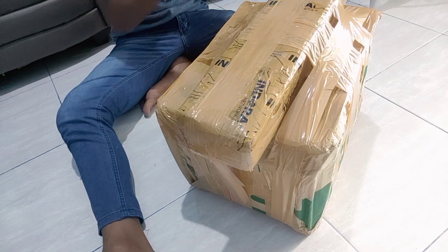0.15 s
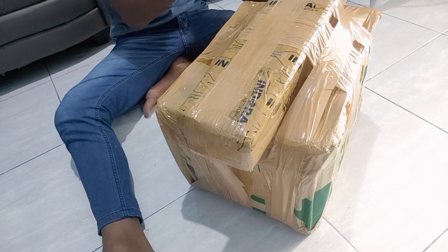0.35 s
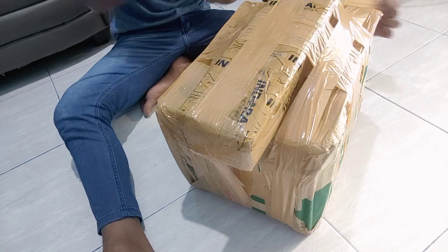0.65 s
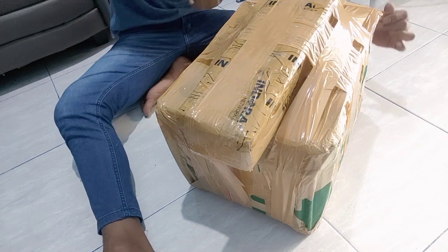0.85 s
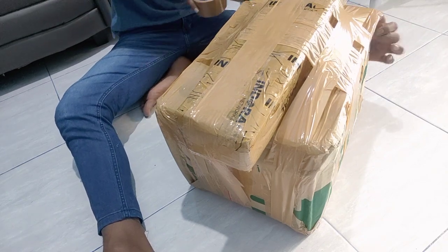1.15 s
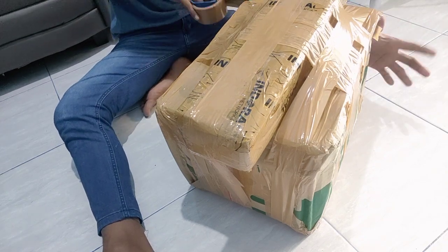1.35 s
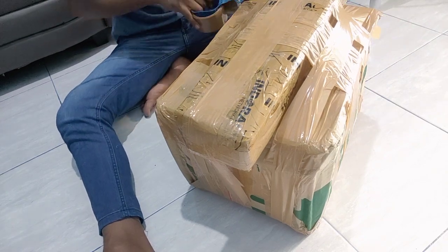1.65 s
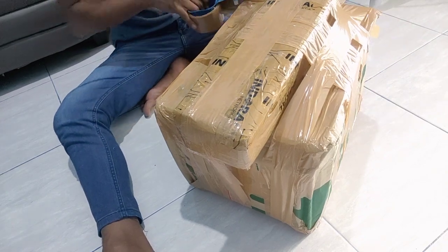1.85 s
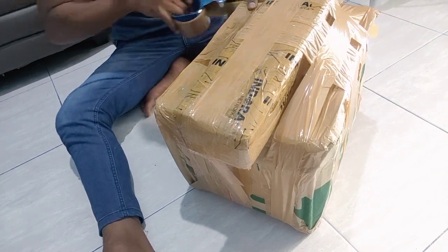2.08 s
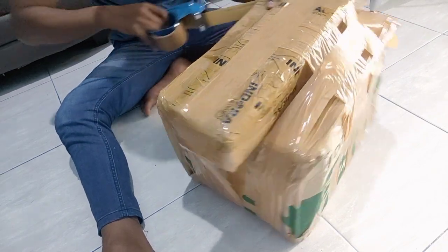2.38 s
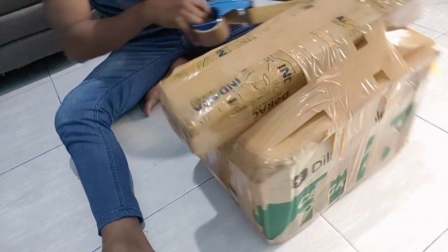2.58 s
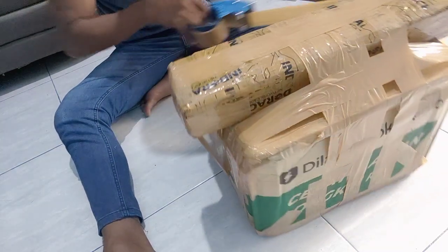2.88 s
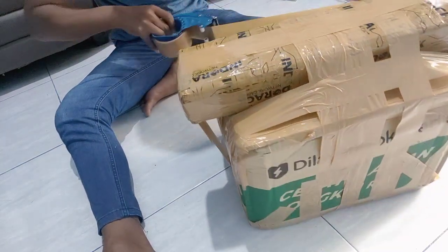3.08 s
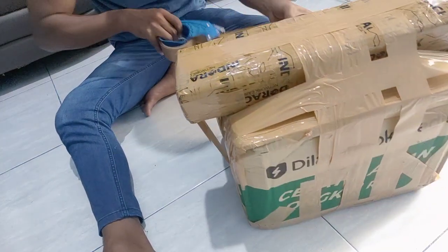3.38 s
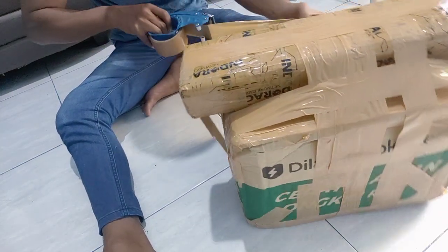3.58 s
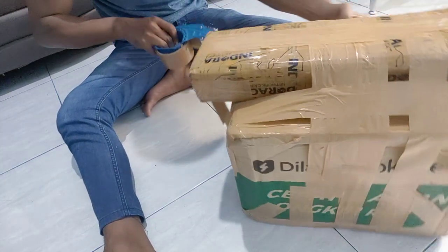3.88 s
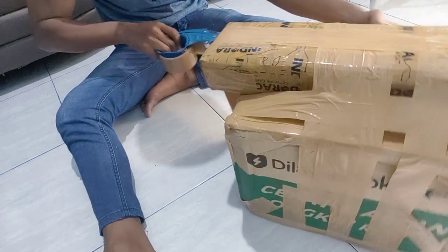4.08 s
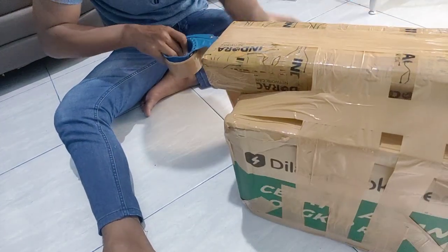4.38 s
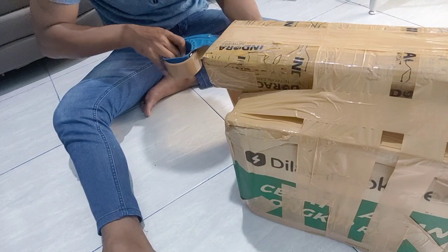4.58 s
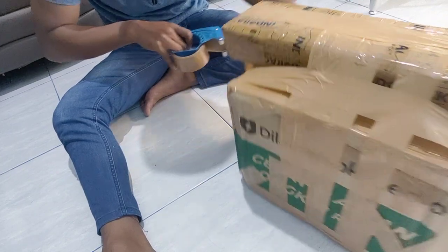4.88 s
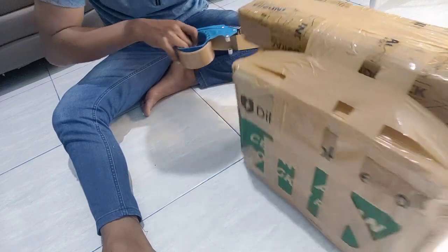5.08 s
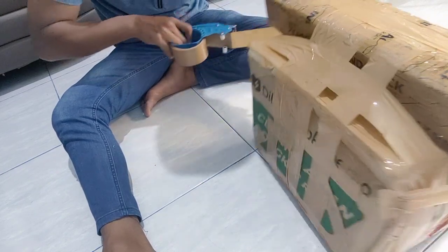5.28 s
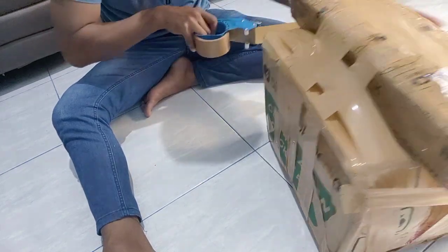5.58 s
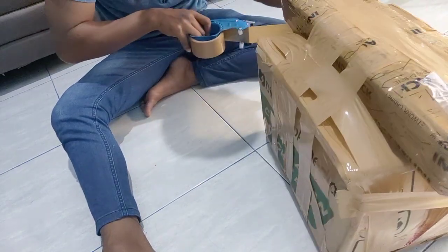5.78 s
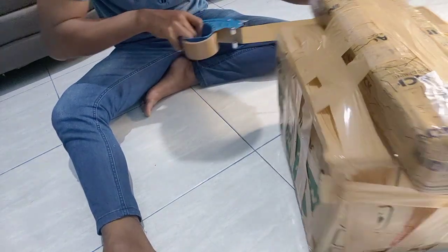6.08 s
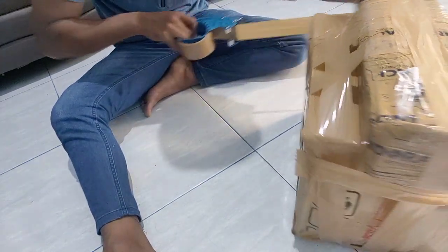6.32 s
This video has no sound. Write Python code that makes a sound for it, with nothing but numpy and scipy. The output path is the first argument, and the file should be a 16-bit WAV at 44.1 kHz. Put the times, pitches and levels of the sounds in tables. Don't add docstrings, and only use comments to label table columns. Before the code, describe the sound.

A hand dispenser rips adhesive tape onto a hollow cardboard box in a small hard-floored room. A fast tearing pull comes first, then a pause with ticks and a thud, two brief rips, a long stutter and two slow jerky pulls that end in the hardest cracks. Cardboard scrapes softly as the box turns. Close stereo pickup, with gain dipping during pulls, occasional low bumps and slight overload.

```python
import sys
import numpy as np
from scipy import signal
from scipy.fft import rfft, irfft
from scipy.io import wavfile
from scipy.ndimage import uniform_filter1d

SR = 44100
rng = np.random.default_rng(int(sys.argv[2]) if len(sys.argv) > 2 else 0)


def voltage_ratio(level):
    return 10 ** (np.asarray(level, float) / 20)


def generate_wav(sig):
    pcm = np.round(np.clip(np.atleast_2d(sig).T, -1, 1) * 32767).astype(np.int16)
    wavfile.write(sys.argv[1], SR, pcm)


N = 284445
TIME = np.arange(N) / SR
# (start [s], last slip [s], gain duck [dB], crackle that shakes the span [dB],
# film whistle [dB])
PULLS = [
    (0, 0.459, -11, 0, -8.5),
    (1.687, 2.06, -9, 4, -27),
    (2.531, 2.839, -7, 1.5, -28),
    (3.105, 3.838, -7, -6, -22.5),
    (4.464, 5.023, -7.5, -4.5, -20),
    (5.608, 6.013, -7.5, -5.5, -23),
]


def at_hz(points, hz):
    table_hz, values = np.transpose(points)
    return np.interp(np.log(hz + 1), np.log(table_hz), values)


def colour(x, spectrum):
    gain = voltage_ratio(at_hz(spectrum, np.fft.rfftfreq(4096, 1 / SR)))
    cepstrum = irfft(np.log(gain / np.sqrt(np.mean(gain ** 2))))
    cepstrum[1:2048] *= 2
    cepstrum[2049:] = 0
    response = irfft(np.exp(rfft(cepstrum)))
    return signal.oaconvolve(x, response[None], axes=1)[:, :x.shape[1]]


def resonance(x, hz, width_hz):
    r = np.exp(-np.pi * width_hz / SR)
    poles = [1, -2 * r * np.cos(2 * np.pi * hz / SR), r * r]
    return signal.lfilter([(1 - r * r) / 2, 0, (r * r - 1) / 2], poles, x + 1e-18)


def gliding(x, hz, width_hz):
    turn = np.exp(2j * np.pi * np.cumsum(hz) / SR)
    r = np.exp(-np.pi * width_hz / SR)
    return 2 * np.real(turn * signal.lfilter([1 - r], [1, -r], x / turn))


def alike_pair(mid, side):
    # (frequency [Hz], left-right likeness [0-1])
    likeness = [(60, 0.96), (240, 0.95), (950, 0.42), (3770, 0.014), (15000, 0.0086)]
    alike = np.clip(at_hz(likeness, np.fft.rfftfreq(len(mid), 1 / SR)), 0, 1)
    both = np.sqrt(1 + alike) * rfft(mid) + np.sqrt(1 - alike) * rfft(side) * [[1], [-1]]
    return irfft(both, len(mid)) / np.sqrt(2)


def impulses(times, sizes):
    train = np.zeros(N)
    train[(np.asarray(times) * SR).astype(int)] = sizes
    return train


def gated(tables):
    curve = 0
    for rows in tables:
        inside = (TIME > rows[0][0]) * (TIME < rows[-1][0])
        curve = curve + voltage_ratio(np.interp(TIME, *np.transpose(rows))) * inside
    return curve


def pull_spans():
    edges = [0] + [int((pull[0] - .1) * SR) for pull in PULLS[1:]] + [N]
    return zip(edges, edges[1:])


def per_pull(values):
    return np.concatenate([np.broadcast_to(v, N)[a:b] for v, (a, b) in zip(values, pull_spans())])


def duck_db():
    hold_s, release_s = 0.097, 0.011
    ducks = []
    for start, end, db, *rest in PULLS:
        recovery = np.exp(-np.maximum(TIME - end - hold_s, 0) / release_s)
        ducks.append(db * (TIME > start) * recovery)
    return uniform_filter1d(np.min(ducks, axis=0), size=80)


def slips():
    # (time [s], crack level [dB])
    lone = [(0.0008, -18.5), (0.244, -23), (0.3078, -23.5), (0.3288, -19), (0.351, -17.5), (0.4, -24),
            (0.4196, -31), (0.4291, -21), (0.4743, -20.5), (1.687, -24), (1.744, -29.5), (1.7732, -28),
            (1.822, -20), (1.8474, -21), (1.8669, -22), (2.066, -18.5), (2.5207, -22.5), (2.5441, -30.5),
            (2.634, -28.5), (2.707, -19.5), (2.7297, -27), (2.774, -24), (2.8393, -20.5),
            (3.1838, -27.5), (3.2106, -21.5), (3.2415, -16), (3.2709, -17.5), (3.3043, -17.5),
                    (3.3386, -17), (3.3701, -14.5), (3.4148, -14.5), (3.4721, -14), (3.566, -17.5),
                    (3.6361, -19.5), (3.6815, -17.5), (3.7132, -23), (3.73, -21.5), (3.7558, -17.5),
                    (3.7791, -19), (3.8154, -19), (3.843, -16.5),
            (4.4639, -21.5), (4.518, -23), (4.5702, -22), (4.6271, -23), (4.6992, -23),
                     (4.7561, -22), (4.796, -18.5), (4.8521, -24), (4.8846, -26.5), (4.9, -32),
                     (4.9178, -24.5), (4.938, -24.5), (4.9703, -17.5), (5.0047, -24.5), (5.032, -14.5),
                     (5.6083, -22), (5.674, -23), (5.7325, -23.5), (5.7666, -26), (5.7948, -17.5),
                     (5.9532, -10.5), (5.9753, -13.5), (6.0184, -16)]
    # (time [s], crack level [dB])
    ticks = [(0.6711, -55), (0.8023, -47), (0.9192, -39), (0.968, -44), (1.0109, -32.5), (1.641, -46),
             (1.659, -45), (1.722, -32.5), (2.9415, -32), (3.0914, -46), (3.1047, -23.5), (3.1399, -26.5),
             (4.163, -52), (4.185, -47.5), (4.2423, -54), (4.259, -47.5), (5.5644, -38.5), (5.628, -25),
             (5.81, -27)]
    # (first [s], last [s], gap [s], first level [dB], last level [dB])
    chatter = [
        (0.026, 0.22, 0.019, -25.5, -23.5),
        (0.359, 0.393, 0.01, -19, -22.5),
        (1.889, 2.044, 0.0154, -26, -18),
        (2.622, 2.82, 0.0135, -26, -24),
        (5.8259, 5.938, 0.012, -22, -12.5),
    ]
    slip_ring_db, tick_ring_db, ring_spread_db = 0.5, -28, 2
    jitter_s, spread_db = 0.00087, 2.5
    rows = [(s, db, slip_ring_db) for s, db in lone]
    rows += [(s, db, tick_ring_db) for s, db in ticks]
    for first, last, gap, first_db, last_db in chatter:
        luck = rng.standard_normal(size=(40, 3))
        for s, (late, loud, ring) in zip(np.arange(first, last, gap), luck):
            db = np.interp(s, [first, last], [first_db, last_db])
            rows.append((s + jitter_s * late, db + spread_db * loud, slip_ring_db - ring_spread_db * abs(ring)))
    return np.transpose(rows)


def bursts(s, level_db, run_ms, fast_ms, slow_ms, slow_db):
    kicks = impulses(np.maximum(s - run_ms / 4000, 0), voltage_ratio(level_db))

    def fall(ms):
        return signal.lfilter([1], [1, -np.exp(-1000 / (ms * SR))], kicks + 1e-18)

    run = np.hanning(int(run_ms * SR / 1000) + 3)
    return signal.oaconvolve(fall(fast_ms) + voltage_ratio(slow_db) * fall(slow_ms), run / run.sum())[:N]


def slip_grit():
    grit = rng.standard_normal((3, N)) * voltage_ratio(4.4 * rng.standard_normal(N))
    return 0.65 * grit[0] + 1.05 * grit[1:]


def crackle(per_s, spread_db):
    # (time [s], level [dB])
    effort = [
        [(0.0, -19), (0.134, -28.5), (0.22, -21.5), (0.321, -18), (0.48, -31)],
        [(0.91, -39), (0.97, -56), (1.01, -43), (1.1, -59)],
        [(1.69, -45), (1.856, -23.5), (2.024, -22.5), (2.07, -59)],
        [(2.53, -33), (2.58, -29), (2.7, -18.5), (2.85, -27)],
        [(3.11, -43), (3.2, -36), (3.4, -30), (3.508, -28), (3.58, -45), (3.7, -31.5), (3.85, -24.5)],
        [(4.47, -55), (4.6, -35.5), (4.824, -25.5), (4.97, -42), (5.04, -12.5)],
        [(5.61, -32), (5.72, -51), (5.8, -26.5), (5.938, -19.5), (5.996, -17.5), (6.03, -43)],
    ]
    sizes = voltage_ratio(spread_db * np.minimum(rng.exponential(1, N), 4)) * rng.standard_normal((2, N))
    snaps = sizes * (rng.random(N) < per_s / SR)
    return gated(effort) * snaps / np.std(snaps)


def cracks(s, crack_db, ring_db, grit):
    full = grit * bursts(s, crack_db + 7.0, run_ms=2.38, fast_ms=0.76, slow_ms=4.7, slow_db=-10)
    thin_db = crack_db - 0.89 * ring_db - 9.0
    thin = grit * bursts(s, thin_db, run_ms=0.82, fast_ms=0.44, slow_ms=3.6, slow_db=-11.5)
    return full + signal.sosfilt(signal.butter(2, 9500, "high", fs=SR, output="sos"), thin)


def film_whistle(fine):
    progress = per_pull(np.clip((TIME - start) / (end - start), 0, 1) for start, end, *rest in PULLS)
    film_hz = 6900 + 1910 * progress
    return gliding(fine * voltage_ratio(per_pull(pull[4] for pull in PULLS)), film_hz, width_hz=2100)


def span_ring(kick):
    # (before [Hz], after [Hz], time of slide [s], ring before [dB], ring after [dB])
    tension = [
        (1760, 1650, 0.29, 1.5, 1.5),
        (1746, 1370, 1.9, 7.5, 1),
        (1790, 1360, 2.61, 2.5, -1.5),
        (1910, 1570, 3.7, 0.5, -2),
        (1860, 1970, 5.015, 1.5, 5.5),
        (1900, 2020, 6.0, -0.5, 7),
    ]

    def slide(before, after, s):
        return before + (after - before) * (1 + np.tanh((TIME - s) / 0.013)) / 2

    hz = per_pull(slide(a_hz, b_hz, s) for a_hz, b_hz, s, a_db, b_db in tension)
    db = per_pull(slide(a_db, b_db, s) for a_hz, b_hz, s, a_db, b_db in tension)
    overtone_db = db - 2.5 - 0.0389 * (hz - 1400)
    ring = gliding(kick * voltage_ratio(db), hz, width_hz=179)
    return ring + gliding(kick * voltage_ratio(overtone_db), 2 * hz, width_hz=240)


def panel_ring(kick, jerk):
    # (flap [Hz], flap width [Hz], flap level [dB], carton [Hz], carton width [Hz],
    # carton level [dB])
    poses = [
        (415, 50, 12, 595, 120, 3.5),
        (1572, 95, 7, 442, 37, 8),
        (1150, 89, 1.5, 384, 163, 6.5),
        (1516, 85, 5, 434, 22.3, 12),
        (1450, 49, 7, 446, 54, 10),
        (1515, 65, 9, 445, 30, 12.5),
    ]
    last_slips = sum(np.abs(TIME - end) < .012 for start, end, *rest in PULLS)
    freed = kick + voltage_ratio(14) * jerk * last_slips
    ring = np.zeros(N)
    for pose, (a, b) in zip(poses, pull_spans()):
        flap_hz, flap_wide, flap_db, carton_hz, carton_wide, carton_db = pose
        ring[a:b] -= voltage_ratio(flap_db - 3.0) * resonance(freed[a:b], flap_hz, flap_wide)
        ring[a:b] += voltage_ratio(carton_db - 1.0) * resonance(kick[a:b], carton_hz, carton_wide)
    return ring


def tape():
    # (frequency [Hz], density [dB per Hz])
    crack_colour = [(150, -17.5), (300, -16), (700, -8), (1100, -3), (2000, -3), (2500, -1), (3500, -1),
                    (5000, -1.5), (8700, -2), (11000, -6.5), (14000, -9.5), (16500, -4.5)]
    s, crack_db, ring_db = slips()
    grit = slip_grit()
    fine = voltage_ratio(-2.0) * crackle(per_s=9000, spread_db=2.0)
    bright = cracks(s, crack_db, ring_db, grit) + fine + film_whistle(fine)
    jerk = -impulses(s + 0.00031, voltage_ratio(crack_db + ring_db + 20.5))
    rattle = grit * bursts(s, crack_db + ring_db + 0.5, run_ms=2.54, fast_ms=1.65, slow_ms=6.4, slow_db=-9.0)
    dull = jerk + rattle + voltage_ratio(per_pull(pull[3] for pull in PULLS)) * fine
    kick = voltage_ratio(-2.0) * dull.sum(axis=0) + voltage_ratio(3.0) * jerk
    low = signal.butter(2, 3500, fs=SR, output="sos")
    near = bright + signal.sosfilt(low, voltage_ratio(-1.0) * dull - bright)
    return colour(near + span_ring(kick) + panel_ring(kick, jerk), crack_colour)


def room(x, gap_ms):
    # (frequency [Hz], decay by 60 dB [s])
    walls = [(300, 0.35), (1000, 0.33), (2000, 0.38), (4000, 0.4), (8000, 0.39), (16000, 0.31)]
    t = np.arange(30000) / SR
    out = np.zeros((2, N + 30000))
    for a, b in pull_spans():
        hz, frames, tail = signal.stft(rng.standard_normal((2, len(t))), SR, nperseg=256)
        fade = voltage_ratio(-60 * frames / at_hz(walls, hz)[:, None])
        tail = signal.istft(tail * fade, SR, nperseg=256)[1][:, :len(t)]
        tail = alike_pair(*tail) * (1 - np.exp(-(1000 * t / gap_ms) ** 2))
        out[:, a:b + len(t) - 1] += signal.fftconvolve(x[None, a:b], tail, axes=1)
    return out[:, :N]


def background():
    # (frequency [Hz], density [dB per Hz])
    air_colour = [(15, 6), (25, -44), (64, -7), (277, -15), (309, -10), (405, -17), (503, -12), (545, -13),
                  (695, -13), (1290, -15), (1400, -18), (7920, -23.5), (16000, -30.5)]
    # (frequency [Hz], rms level [dB])
    hum_lines = [
        (59.2, -56),
        (199.2, -63.5),
        (312.2, -64),
    ]
    hiss = alike_pair(*rng.standard_normal((2, N + N % 2)))[:, :N]
    sound = colour(hiss, air_colour) * voltage_ratio(-44.0)
    for hz, db in hum_lines:
        line = resonance(rng.standard_normal(N), hz, width_hz=4.0)
        line = resonance(line, hz, width_hz=4.0)
        sound = sound + voltage_ratio(db + 1.0) * line / np.std(line)
    return sound


def knocks():
    # (time [s], peak level [dB])
    thuds = [
        (0.922, -31),
        (1.619, -35),
        (1.685, -36),
        (2.513, -44),
        (3.088, -33),
        (4.159, -37),
        (5.677, -38),
    ]
    s, db = np.transpose(thuds)
    push = signal.lfilter(np.hanning(120), [1], impulses(s, voltage_ratio(db + 4.5)))
    return resonance(push, 182, width_hz=42) - resonance(push, 212, width_hz=150)


def drag():
    # (start [s], loudest [s], end [s], level [dB])
    turns = [
        (1.746, 1.835, 3.1, -47),
        (2.552, 2.803, 5.9, -57.5),
        (5.605, 5.624, 5.76, -52),
    ]
    rub = resonance(rng.standard_normal(N), 306, width_hz=210)
    strokes = [[(a, db - 28), (top, db), (b, db - 29)] for a, top, b, db in turns]
    return voltage_ratio(6.0) * gated(strokes) * rub / np.std(rub)


def capsule_jolts():
    # (time [s], left jump [full scale], right jump [full scale])
    shoves = [(2.519, -0.01, -0.018), (3.474, 0.036, -0.0051), (4.5224, 0.004, 0.13),
              (4.5727, 0.028, -0.073), (4.63, 0.00084, -0.047), (4.798, 0.12, 0.019),
              (4.8524, -0.025, -0.015), (4.9167, -0.025, -0.009), (5.009, -0.082, 0.017),
              (5.036, 0.05, 0.18), (5.6786, 0.045, -0.014), (5.8705, 0.054, -0.0012),
              (5.936, -0.044, -0.25), (5.954, -0.23, -0.016), (5.9785, 0.067, 0.14)]
    s, left, right = np.transpose(shoves)
    jumps = np.array([impulses(s - .0015, 1.18 * side) for side in (left, right)])
    steps = signal.lfilter(np.hanning(50) / 24.5, [1, -1], jumps)
    return signal.sosfilt(signal.butter(3, 42, "high", fs=SR, output="sos"), steps)


def limiter_db(x, top_db, share, recover_db_s, attack_ms):
    over = np.maximum(20 * np.log10(np.abs(x).max(axis=0) + 1e-9) - top_db, 0)
    ramp = recover_db_s * TIME
    held = np.maximum.accumulate(share * over + ramp) - ramp
    r = np.exp(-1000 / (attack_ms * SR))
    return -signal.lfilter([1 - r], [1, -r], held)


def scene():
    left, right = (tape() + knocks() + drag()) * voltage_ratio(-duck_db())
    near = np.array([left, np.roll(right, 3)])
    tail = voltage_ratio(-29.5) * room(near.mean(axis=0), gap_ms=12.9)
    return near * voltage_ratio([[-.4], [.4]]) + tail + background()


def top_cut(x):
    return signal.sosfilt(signal.butter(12, 17020, fs=SR, output="sos"), x)


def record(dry):
    x = dry + voltage_ratio(-1.5) * resonance(dry, 7760, width_hz=2920)
    x = x * voltage_ratio(duck_db())
    x = x * voltage_ratio(limiter_db(x, top_db=-6.5, share=0.64, recover_db_s=148, attack_ms=3.6))
    x = x + capsule_jolts() + .0015
    x = .95 * np.tanh(x / .95)
    x = signal.sosfilt(signal.cheby2(22, 48, 16080, fs=SR, output="sos"), x)
    return top_cut(x)


dry = scene()
out = record(dry)
generate_wav(out)
```